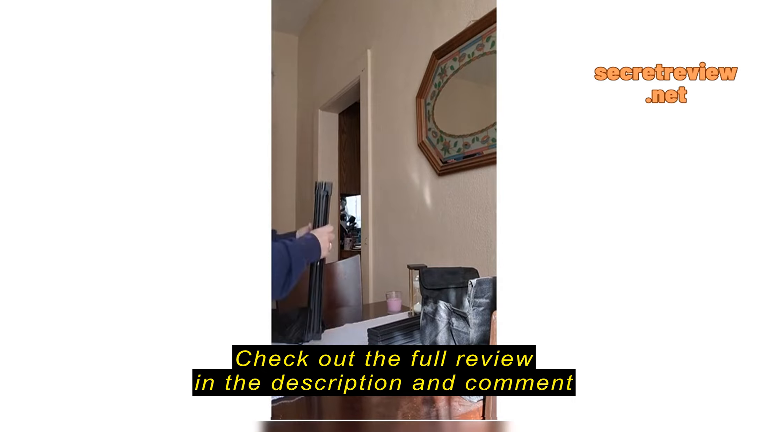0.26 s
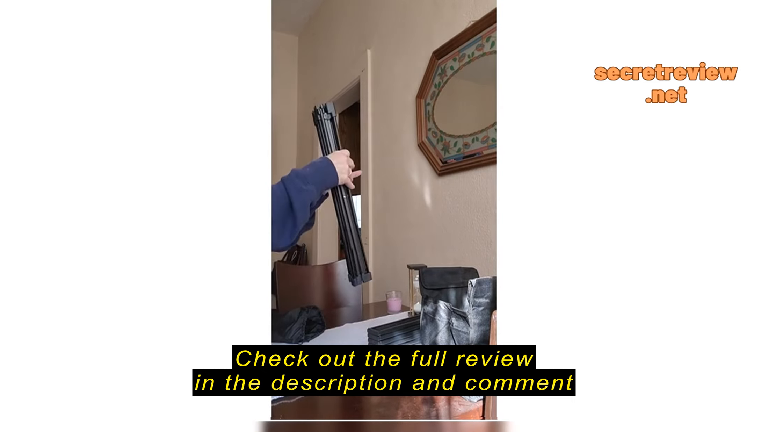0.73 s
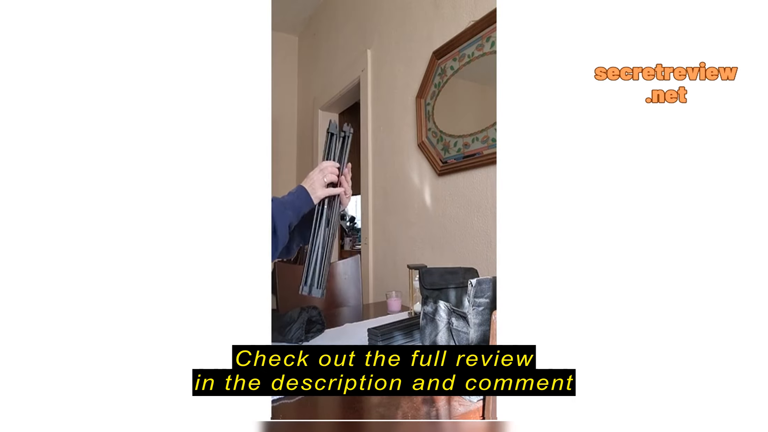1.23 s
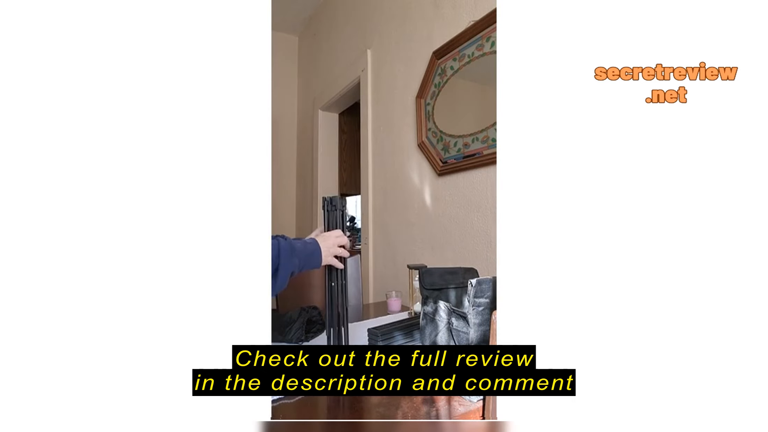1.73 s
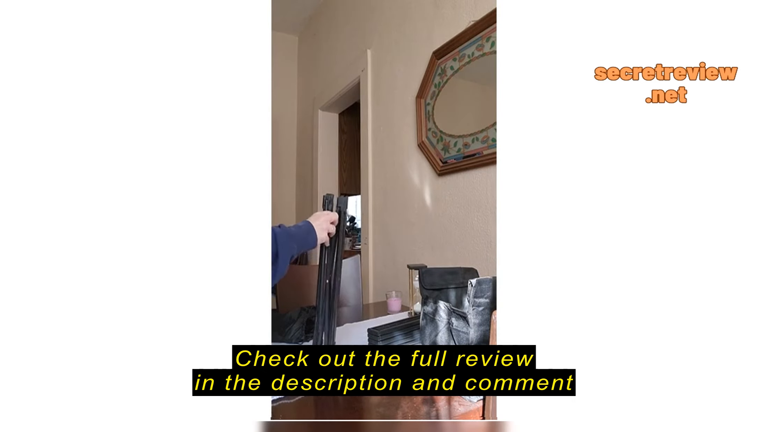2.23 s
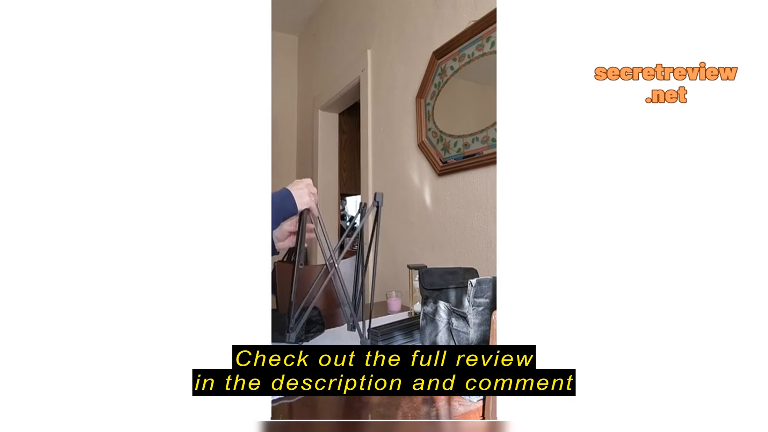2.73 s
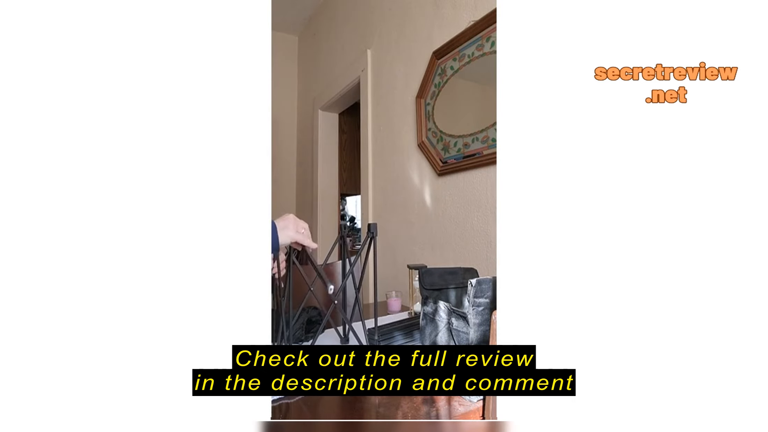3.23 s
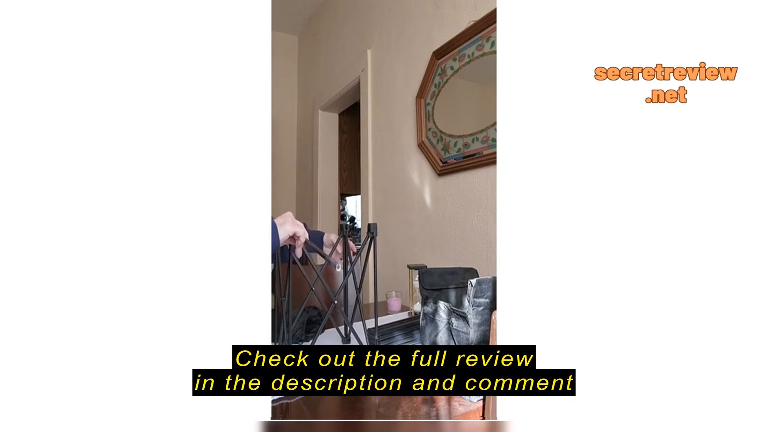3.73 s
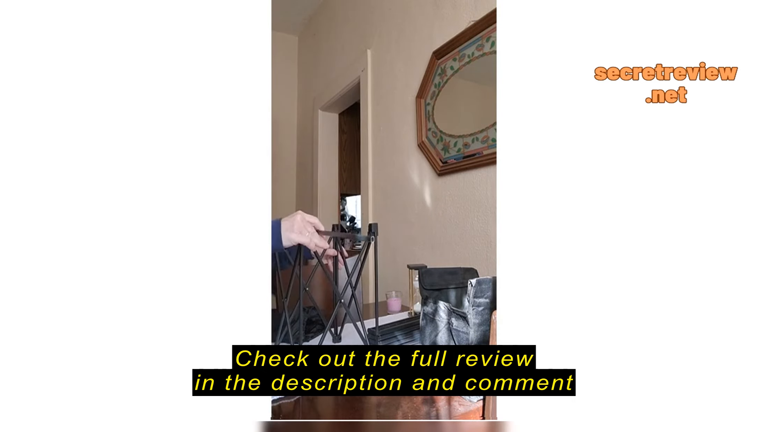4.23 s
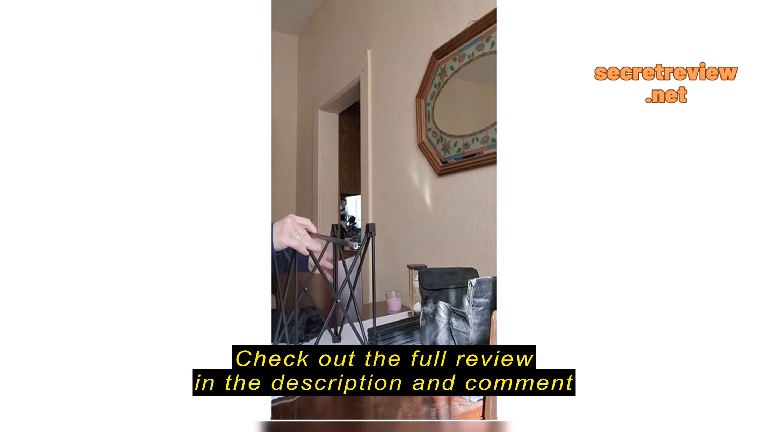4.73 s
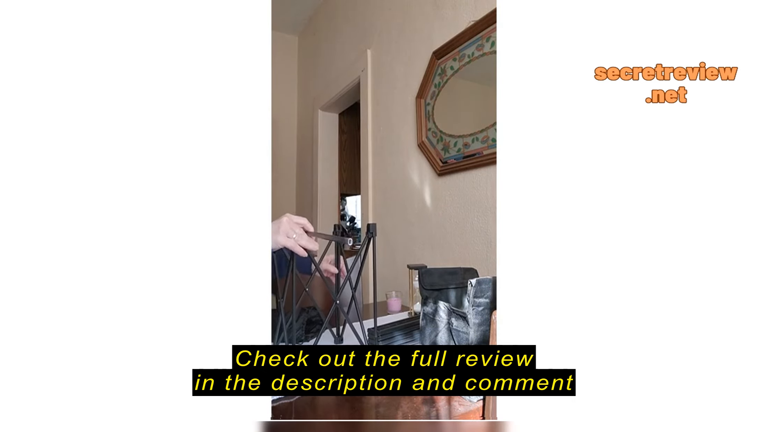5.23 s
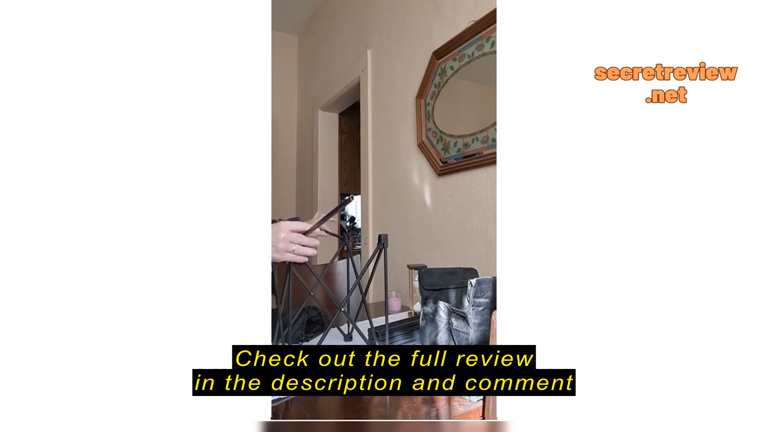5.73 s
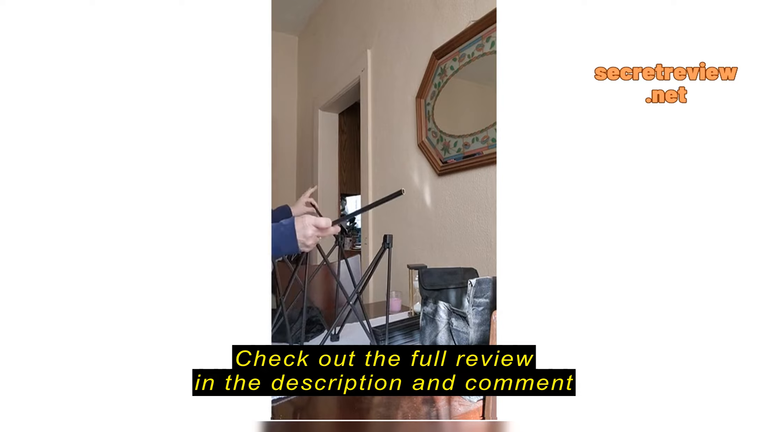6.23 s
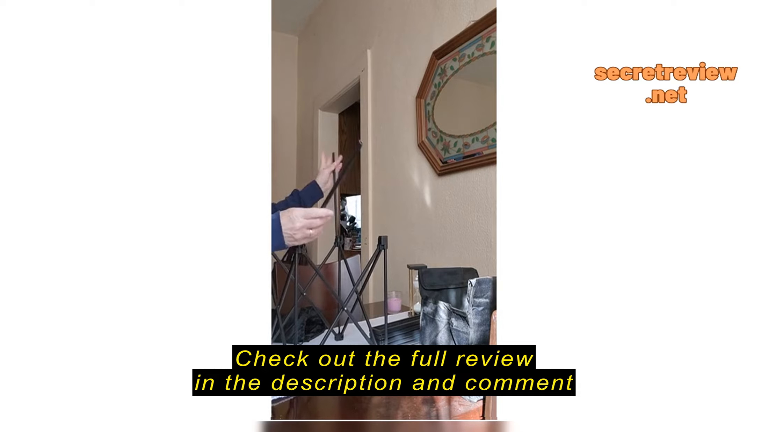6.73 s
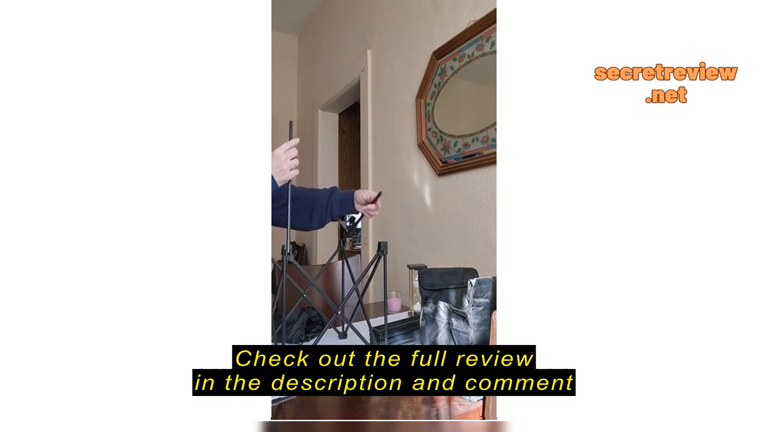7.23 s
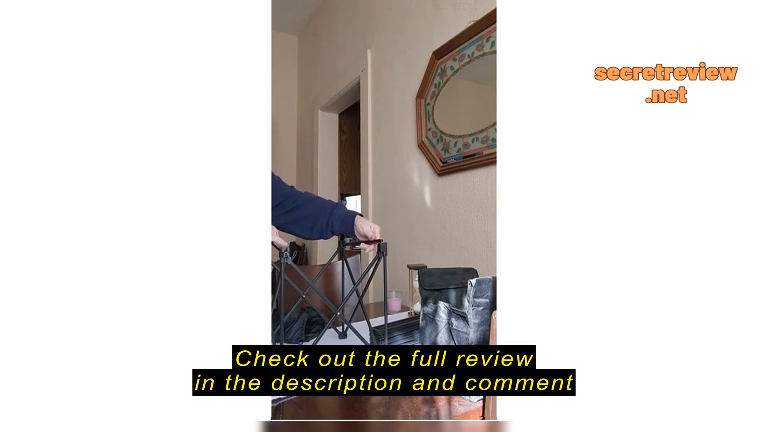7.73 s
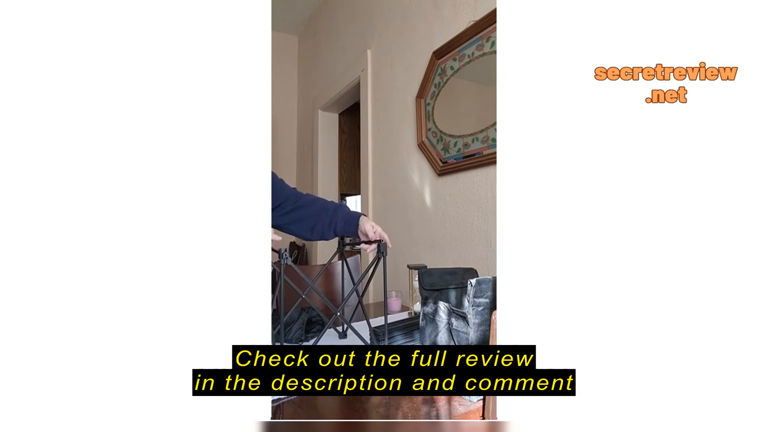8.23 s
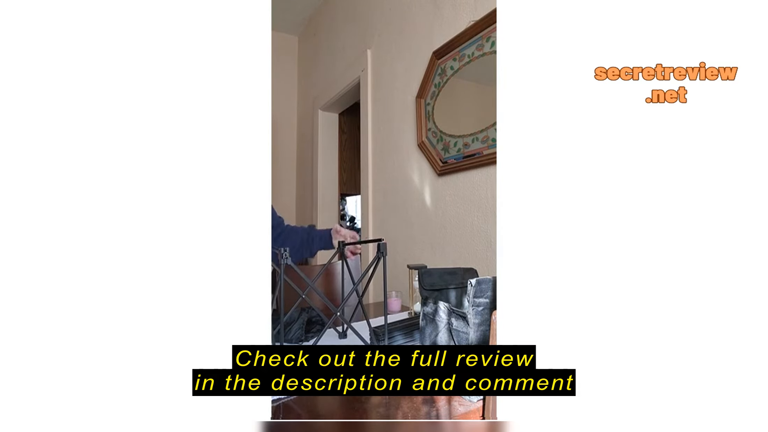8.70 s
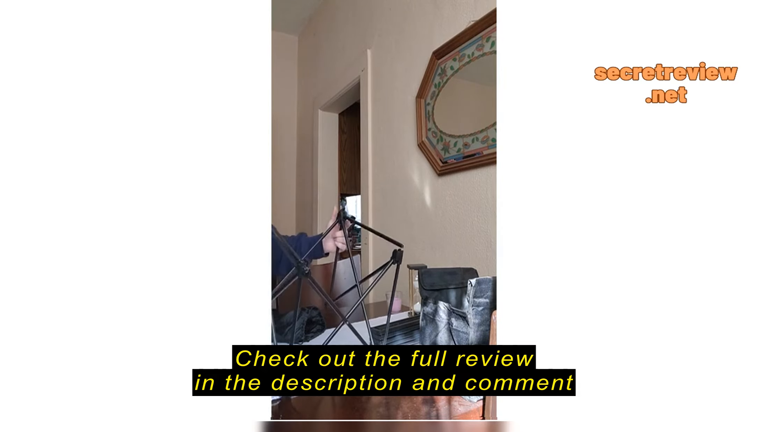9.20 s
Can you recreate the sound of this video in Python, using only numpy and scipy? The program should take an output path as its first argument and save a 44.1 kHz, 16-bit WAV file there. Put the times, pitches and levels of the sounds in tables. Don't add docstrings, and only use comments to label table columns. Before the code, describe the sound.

In a small furnished room, cloth brushes a bundle of thin metal legs that clack dully on wood. After a second the frame opens with sharp aluminium snaps and shivering joints. Two heavy thuds boom through the tabletop around three and four and a half seconds, then light ticks and slides continue. Faint low hum and room noise; close stereo phone microphone.

```python
import sys
import numpy as np
from scipy import signal
from scipy.io import wavfile

SR = 44100
rng = np.random.default_rng(int(sys.argv[2]) if len(sys.argv) > 2 else 0)


def put_to_file(sound):
    columns = np.atleast_2d(sound).T
    safe = np.clip(columns, -1, 1)
    whole_steps = np.round(safe * 32767)
    wavfile.write(sys.argv[1], SR, whole_steps.astype(np.int16))


def undo_db(level):
    steps = np.asarray(level, float) / 20
    return 10 ** steps


N = 417186

# (time [s], peak [dB], low share [dB], high share [dB], fade [s])
TUBE_SNAPS = [(1.2685, -25.5, -0.5, 1.5, 0.02), (1.3275, -22, 10.5, 11, 0.018),
              (1.3592, -19.5, -23, -1, 0.02), (1.4498, -41, 14.5, 2, 0.014), (2.1679, -22, -8, -15, 0.0031),
              (2.2919, -13.5, 1, 8.5, 0.004), (2.3547, -32.5, 6.5, 11.5, 0.015),
              (2.4843, -26, -1, -22, 0.0031), (3.036, -31.5, 8.5, -2, 0.028),
              (3.0699, -19.5, -24, 4, 0.012), (3.324, -32, -6, -38, 0.046), (3.4053, -34, -5, 9, 0.016),
              (3.5306, -18.5, -9, 9, 0.0022), (3.5328, -14.5, -12.5, 12, 0.0022),
              (3.8975, -33, -3, 2, 0.006), (3.9865, -33.5, 5, 24, 0.018), (4.0089, -37, 14.5, 20, 0.0078),
              (4.349, -31, -5.5, -7.5, 0.017), (4.5253, -22, 13, 11, 0.0071),
              (4.5356, -18.5, -6, 15, 0.0055), (4.5544, -30.5, 2, 20, 0.0097),
              (4.991, -29, 0.5, 7.5, 0.013), (6.3096, -36.5, 4, 14, 0.0054),
              (7.6728, -35, 2.5, 12.5, 0.0075)]
# (time [s], peak [dB], brightness [dB])
TUBE_TICKS = [(1.4994, -44.5, -18), (2.1854, -54, 16), (2.5024, -59, 6), (2.6324, -38.5, -1),
              (2.6564, -50, -13), (2.8579, -44.5, -20), (2.8848, -48.5, -24), (3.2994, -46.5, -5),
              (3.8018, -48, 3), (4.2004, -40.5, 6), (4.7222, -44, -13), (4.8105, -45.5, -1.5),
              (4.8713, -40.5, 8), (4.9013, -38, 10), (5.1447, -40.5, -1), (5.7574, -50, 0),
              (5.8267, -41, 2), (5.8676, -40.5, -1), (5.9374, -45, 7), (6.2871, -36.5, 8), (6.5435, -42, 1),
              (6.7575, -45, -5), (7.0758, -49, 3), (7.1731, -49, 9), (7.457, -48.5, -8), (7.6425, -45.5, 4),
              (7.875, -48, -4), (7.9374, -54.5, -4), (8.3933, -51, -13), (8.8134, -49.5, -2)]
# (time [s], peak [dB], brightness [dB])
JOINT_SLIDES = [(1.2396, -31.5, 13), (2.2754, -46, 5), (2.7926, -45.5, -14), (3.6476, -36, -4),
                (3.8661, -46.5, -21), (3.92, -38, 2), (4.1131, -39, -13.5), (5.5408, -37.5, 9),
                (5.7229, -43.5, 1), (5.9808, -38.5, 9), (6.0144, -36, 6), (6.1908, -41.5, 0),
                (6.4717, -41, 8), (6.8853, -49.5, 0), (7.2464, -43.5, 6), (7.3194, -45, -4),
                (7.5163, -38, 7), (7.7418, -36.5, 12), (7.8074, -43.5, -10.5), (8.1459, -44, -9),
                (8.2034, -50, -26), (8.7685, -56, 10.5), (8.8942, -54, -11), (8.9314, -50.5, -3),
                (8.9794, -51, -26), (9.1581, -48, 5), (9.2618, -50, 7.5), (9.4185, -45.5, 3.5)]
# (time [s], level
# [dB], hold [s])
METAL_GRIT = [(1.41, -54.5, 0.01), (2.3, -67, 0.14), (2.4, -79.5, 3), (3.3, -64, 0.1),
              (3.88, -57.5, 0.15), (4.05, -56, 0.023), (4.25, -66, 0.067), (4.56, -48, 0.0053),
              (4.95, -57, 0.062), (5.6, -73.5, 2.91), (5.9, -59.5, 0.16), (6.28, -58, 0.045),
              (6.53, -64, 0.014), (7.1, -72.5, 0.67), (7.71, -65, 0.015), (8.2, -66.5, 0.093),
              (9.0, -72.5, 0.66)]
# (pitch [Hz], level [dB], T60 [s])
TUBE_MODES = [(2350, -13, .03), (3350, -11, .03), (4060, -3, .035), (4290, -8, .03), (5190, -7, .03),
              (5735, -5, .03), (6520, 0, .045), (7350, -6, .025), (7980, -6, .05), (9460, -5, .05),
              (12650, -5, .04), (12770, -3, .05), (15130, -6, .02)]
CRACK_EDGES_HZ = (900, 3600, 9000, 19800)
# (time [s], peak [dB], low share [dB], top share [dB], fade [s])
BUNDLE_CLACKS = [(0.088, -46.5, 1.5, -14, 0.008), (0.173, -50.5, 3, 10, 0.015),
                 (0.225, -50, -5, 17, 0.0052), (0.248, -33.5, 9, 6.5, 0.011), (0.321, -55.5, 17, 17, 0.013),
                 (0.577, -39, -22, -2, 0.0046), (0.632, -26, -23, 8.5, 0.0062),
                 (0.66, -36, 12, -4.5, 0.0059), (0.787, -26.5, -22, -1, 0.0079),
                 (0.803, -25.5, -9.5, 0.5, 0.0087), (0.973, -37, 4, -1, 0.0033),
                 (7.811, -48, 2.5, 6, 0.0064), (8.313, -47, 6, 1.5, 0.003)]
# (pitch [Hz], level [dB], T60 [s])
BUNDLE_MODES = [(880, -4, .025), (1020, 1, .025), (1223, 3, .025), (1440, -3, .025), (1580, -3, .025),
                (1910, -2, .025), (2560, -8, .03), (3650, -10, .03)]
# (time [s], level [dB], hold [s])
SLEEVE_BRUSHES = [
    (0.0, -63, 0.28),
    (0.22, -63.5, 0.036),
    (0.59, -61.5, 0.013),
    (0.778, -58.5, 0.015),
    (0.9, -72.5, 0.081),
]
# (low [Hz], high [Hz])
CLOTH_BAND_HZ = (190, 6600)
# (time [s], peak [dB], panel pitch [Hz], panel level [dB], sway level [dB])
TABLE_THUMPS = [(0.506, -45.5, 186, -42.5, -67), (0.631, -45.5, 196, -39, -50.5),
                (0.799, -43, 310, -40.5, -81), (0.972, -65, 280, -46.5, -67),
                (1.33, -45, 323, -44.5, -70.5), (1.411, -65, 232, -44, -75),
                (3.036, -19.5, 195, -30.5, -49.5), (4.023, -54, 280, -48.5, -55),
                (4.527, -22, 180, -33, -45), (4.98, -59, 244, -43, -50), (5.051, -54, 194, -48.5, -51.5),
                (5.247, -65, 272, -46.5, -77), (5.439, -56, 232, -41.5, -86), (5.806, -48, 272, -67, -55),
                (7.472, -72, 276, -50.5, -72), (7.749, -45.5, 260, -49.5, -59), (7.818, -50, 246, -59, -63),
                (9.246, -62, 304, -57, -73)]
# (pitch [Hz], level [dB], T60 [s])
BOARD_MODES = [(66, -10, .18), (112, 0, .42), (121, -3, .3), (194, -14, .2), (275, -12, .2), (299, -15, .1),
               (452, -16, .1), (506, -16, .1)]
# (pitch [Hz], level [dB], T60 [s])
TABLE_SWAY = [(36, 3.5, 0.97)]
# (lag [s], level [dB])
BOARD_AT_LEFT = (0.00013, 0.86)
# (from time [s], lag [s], level [dB])
HAND_PLACES = [(0, .00002, -1.3), (0.449, -0.00047, -1), (0.749, .0001, 0.5), (1.1, -0.0035, -0.5),
               (2.0, -0.0012, -0.5), (2.899, -0.00086, 2), (3.45, 0.0011, 2.5), (4.4, -0.0022, -1),
               (5.4, -0.0067, 0.3), (6.1, -0.00081, 0.3), (6.6, -.0001, 2), (7.4, -0.0051, -1),
               (8.0, -0.0052, -0.5), (8.6, -0.0046, 0.8)]
# (frequency [Hz], T60 [s])
ROOM_DECAY = [(100, 0.91), (500, 0.27), (2000, 0.31), (6000, 0.22), (15000, 0.15)]
# (frequency [Hz], level [dB per Hz])
AIR_SPECTRUM = [(15, -43), (25, -6.5), (55, -3.5), (81, -10.5), (125, -10.5), (254, -16.5), (527, -15),
                (760, -19), (818, -20.5), (2840, -30), (3450, -31.5), (8500, -36.5), (16000, -38)]
# (frequency [Hz], likeness [-1 to 1])
AIR_LIKENESS = [(60, 0.89), (240, 0.96), (950, 0.22), (3770, 0.017), (15000, 0.02)]
# (pitch [Hz], width [Hz], level [dB])
MAINS_HUM = (119, 3.3, -67.5)
# (centre [Hz], width [Hz], depth [0-1])
MIC_PORT_DIP = (10230, 5870, 0.56)

SNAP_RING_DB, TICK_RING_DB, SLIDE_RING_DB = -7.5, -2.5, 4.5
TICK_FADE_S, SLIDE_FADE_S = 0.017, 0.037
DULL_BODY = 0.39
SHAKE_RISE_DB_PER_S, SHAKE_FALL_DB_PER_S = 117, 127.5
BRUSH_RISE_DB_PER_S, BRUSH_FALL_DB_PER_S = 128, 158
SETTLE_S, HEAVY_SETTLE_S, HEAVY_DB = 0.055, 0.077, -34
ROOM_DB, ROOM_WIDE_HZ = 0.5, 520
AIR_DB = -63
AIR_EDGE_HZ, AIR_ABOVE_DB = 8700, -21
CUTOFF_HZ = 15900


def tubes():
    s, peak_db, low_db, high_db, ring_db, fade = contacts()
    at, sizes = rattle(s, fade, lead_s=0.014, lead_db=-6.0, spread_db=6.5, count=200)
    blow_db = peak_db + 8.0
    grit = (rng.random(N) < 3000 / SR) * undo_db(6.2 * np.minimum(rng.exponential(1, N), 4))
    grit = grit * rng.choice([-1, 1], N)
    shaking = strokes(METAL_GRIT, SHAKE_RISE_DB_PER_S, SHAKE_FALL_DB_PER_S)
    grit = undo_db(3) * shaking * rms_one(grit)
    parts = [(low_db - 11.0, -10), (0 * s, 0), (high_db - 11, -10)]  # (blow dB, shiver dB)
    clicks = [train(at, sizes, blow_db + db) + undo_db(shiver_db) * grit for db, shiver_db in parts]
    crack = split(clicks, CRACK_EDGES_HZ)
    rings = struck(TUBE_MODES, at, sizes, blow_db + ring_db - 35, spread_db=6, drive=undo_db(-36) * grit)
    thin = signal.butter(2, 800, "high", fs=SR, output="sos")
    return signal.sosfilt(thin, crack + rings)


def contacts():
    hard = [(s, db, low, high, SNAP_RING_DB, fade) for s, db, low, high, fade in TUBE_SNAPS]
    ticks = [(s, db, -DULL_BODY * bright, bright, TICK_RING_DB, TICK_FADE_S)
             for s, db, bright in TUBE_TICKS]
    slides = [(s, db, -DULL_BODY * bright, bright, SLIDE_RING_DB, SLIDE_FADE_S)
              for s, db, bright in JOINT_SLIDES]
    return np.transpose(hard + ticks + slides)


def bundle():
    s, peak_db, low_db, top_db, fade = np.transpose(BUNDLE_CLACKS)
    at, sizes = rattle(s, fade, lead_s=0.01, lead_db=-13.5, spread_db=7.0, count=200)
    blow_db = peak_db + 18.5
    shares_db = (low_db - 6.5, 0, top_db - 15, top_db - 34)
    clicks = [train(at, sizes, blow_db + db) for db in shares_db]
    crack = split(clicks, (250, 800, 1550, 4600, 15000))
    hollow = struck(BUNDLE_MODES, at, sizes, blow_db - 40, spread_db=4)
    cloth = rng.standard_normal(N) * undo_db(1.8 * rng.standard_normal(N // 64 + 1)).repeat(64)[:N]
    brushing = strokes(SLEEVE_BRUSHES, BRUSH_RISE_DB_PER_S, BRUSH_FALL_DB_PER_S)
    return crack + hollow + brushing * rms_one(band(cloth, *CLOTH_BAND_HZ))


def table_top():
    s, peak_db, panel_hz, panel_db, sway_db = np.transpose(TABLE_THUMPS)
    fade = np.where(peak_db > HEAVY_DB, HEAVY_SETTLE_S, SETTLE_S)
    at, sizes = rattle(s, fade, lead_s=0.012, lead_db=-3, spread_db=-1, count=30)
    first_at, first_size = at[:, :1], sizes[:, :1]
    board = struck(BOARD_MODES, first_at, first_size, peak_db - 6, spread_db=1.5)
    board = board + struck(TABLE_SWAY, first_at, first_size, sway_db - 1.5, spread_db=3.5)
    panels = sum(ring(train(at[[k]], sizes[[k]], panel_db[[k]] - 6), hz, .045)
                 for k, hz in enumerate(panel_hz))
    soft = signal.butter(2, 450, fs=SR, output="sos")
    body = band(train(at, sizes, panel_db + 25.5), 110.0, 418)
    return signal.sosfilt(soft, board + panels), body


def rattle(times, fade, lead_s, lead_db, spread_db, count):
    when = .12 * rng.random((len(times), count)) ** 2 * (np.arange(count) > 0)
    when[:, 4::5] *= -.25
    luck = rng.standard_normal((len(times), count))
    after = np.exp(-np.abs(when) / np.clip(fade, 1e-3, 1)[:, None])
    before = undo_db(lead_db) * np.exp(-np.abs(when) / lead_s)
    shape = np.where(when < 0, before, after)
    sizes = shape * undo_db(-spread_db * np.abs(luck)) * np.sign(luck)
    sizes[:, 0] = 1.1
    at = ((times[:, None] + when) * SR).astype(int)
    return np.clip(at, 0, N - 1), sizes


def train(at, sizes, level_db):
    return np.bincount(at.ravel(), (sizes * undo_db(level_db)[:, None]).ravel(), N)


def struck(modes, at, sizes, level_db, spread_db, drive=0.):
    luck = np.clip(rng.standard_normal((len(at), len(modes))), -3, 1.3)
    out = 0
    for k, (hz, db, t60) in enumerate(modes):
        clicks = train(at, sizes, level_db + spread_db * luck[:, k]) + drive
        out = out + (-1) ** k * undo_db(db) * ring(clicks, hz, t60)
    return out


def ring(clicks, hz, t60):
    r = undo_db(-60 / (max(t60, .005) * SR))
    w = 2 * np.pi * hz / SR
    return signal.lfilter([0, np.sin(w)], [1, -2 * r * np.cos(w), r * r], clicks + 1e-18)


def strokes(rows, rise_db_per_s, fall_db_per_s):
    t = np.arange(0, N, 64)[None] / SR
    s, level_db, hold = np.transpose(rows)[:, :, None]
    loss_db = rise_db_per_s * np.maximum(s - t, 0) + fall_db_per_s * np.maximum(t - s - hold, 0)
    return undo_db(np.interp(np.arange(N) / SR, t[0], np.max(level_db - loss_db, axis=0)))


def split(trains, edges_hz):
    return sum((-1) ** k * band(x, edges_hz[k], edges_hz[k + 1]) for k, x in enumerate(trains))


def band(x, low_hz, high_hz):
    sos = signal.butter(2, [low_hz, min(high_hz, .45 * SR)], "band", fs=SR, output="sos")
    return signal.sosfilt(sos, x + 1e-18)


def rms_one(x):
    return x / np.sqrt(np.mean(x ** 2) + 1e-20)


def at_hz(points, hz):
    table_hz, values = np.array(points).T
    return np.interp(np.log(hz), np.log(table_hz), values)


def ports(x, lag_s, left_db):
    return np.array([undo_db(left_db) * np.roll(x, round(lag_s * SR)), x])


def placed(near, sent):
    out = np.zeros((2, N + SR))
    starts = [int(s * SR) for s, _, _ in HAND_PLACES] + [N]
    for first, last, (_, lag_s, left_db) in zip(starts, starts[1:], HAND_PLACES):
        echoes = room(sent[first:last])
        out[:, first:first + echoes.shape[1]] += echoes
        out[:, first:last] += ports(near[first:last], lag_s, left_db)
    return out[:, :N]


def room(x, first_s=0.0032):
    t = np.arange(SR // 3) / SR
    edges = 160 * 2 ** np.arange(0, 8.)
    white = rng.standard_normal((2, len(t)))
    fades = [undo_db(-60 * t / at_hz(ROOM_DECAY, hz)) for hz in np.sqrt(2) * edges[:-1]]
    mid, side = split([white * fade for fade in fades], edges) * (t > first_s)
    side = signal.sosfilt(signal.butter(4, ROOM_WIDE_HZ, "high", fs=SR, output="sos"), side)
    tail = np.array([mid + side, mid - side])
    tail = tail / np.sqrt(np.sum(tail ** 2) / 2)
    return undo_db(ROOM_DB) * signal.fftconvolve(x[None], tail, axes=1)


def air():
    out = 0
    edges = 20 * 2 ** np.arange(0, 9.8, 1 / 3)
    white = rng.standard_normal((2, 2, N))
    for k, (low, high) in enumerate(zip(edges, edges[1:])):
        mid, side = band(white[k % 2], low, high)
        centre_hz = np.sqrt(low * high)
        alike = np.clip(at_hz(AIR_LIKENESS, centre_hz), -1, 1)
        stereo = np.sqrt(1 + alike) * mid + np.sqrt(1 - alike) * side * [[1], [-1]]
        out = out + undo_db(at_hz(AIR_SPECTRUM, centre_hz)) * stereo
    below = signal.sosfiltfilt(signal.butter(16, AIR_EDGE_HZ, fs=SR, output="sos"), out)
    out = below + undo_db(AIR_ABOVE_DB) * (out - below)
    hz, width_hz, hum_db = MAINS_HUM
    hum = band(rng.standard_normal(N), hz - width_hz / 2, hz + width_hz / 2)
    return undo_db(AIR_DB) * rms_one(out) + undo_db(hum_db) * rms_one(hum)


def scene():
    metal = bundle() + tubes()
    board, body = table_top()
    return placed(metal, metal + body) + ports(board + body, *BOARD_AT_LEFT) + air()


def top_cut(x):
    return signal.sosfilt(signal.butter(12, 16980, fs=SR, output="sos"), x)


def record(dry):
    hz, width_hz, depth = MIC_PORT_DIP
    dip = signal.lfilter(*signal.iirpeak(hz, hz / width_hz, fs=SR), dry)
    dry = dry - np.clip(depth, 0, 1) * dip
    dry = signal.sosfilt(signal.ellip(8, .5, 55, CUTOFF_HZ, fs=SR, output="sos"), dry)
    return top_cut(dry)


dry = scene()
out = record(dry)
put_to_file(out)
```